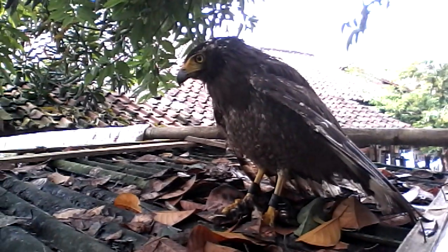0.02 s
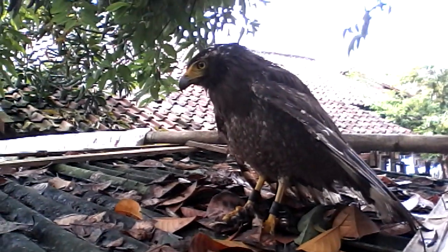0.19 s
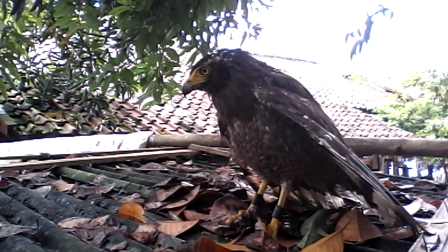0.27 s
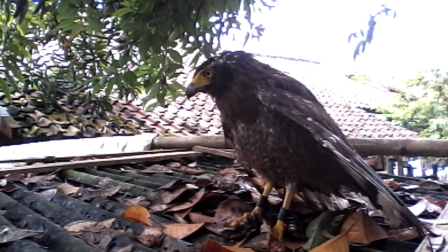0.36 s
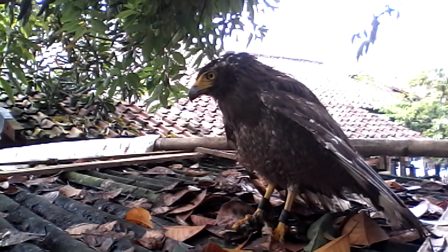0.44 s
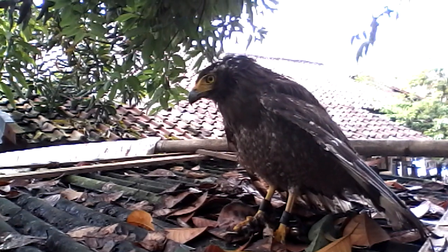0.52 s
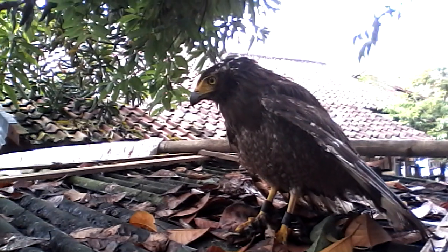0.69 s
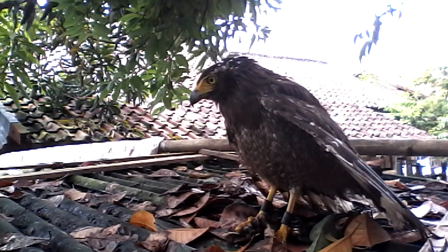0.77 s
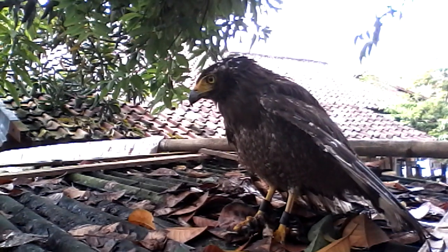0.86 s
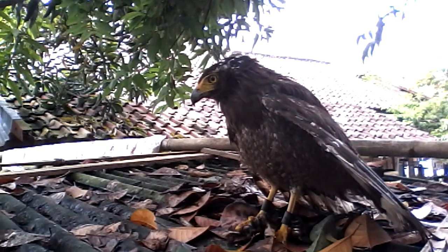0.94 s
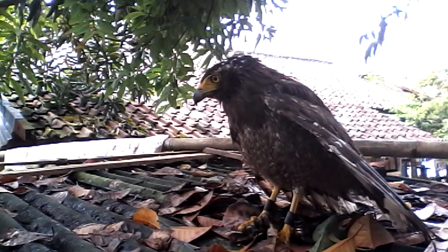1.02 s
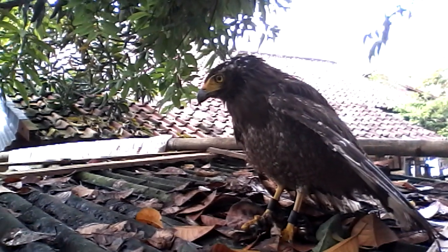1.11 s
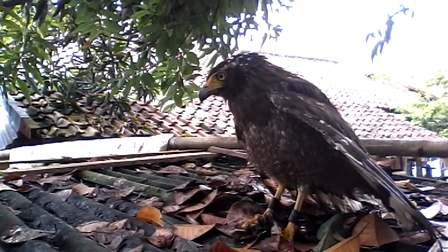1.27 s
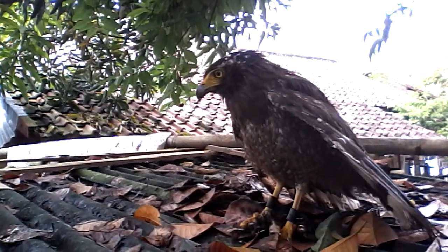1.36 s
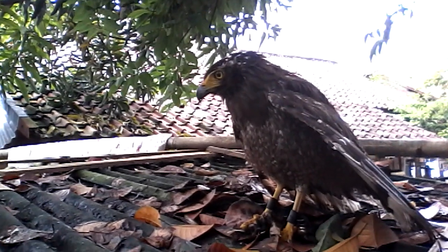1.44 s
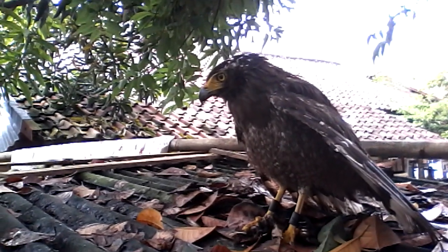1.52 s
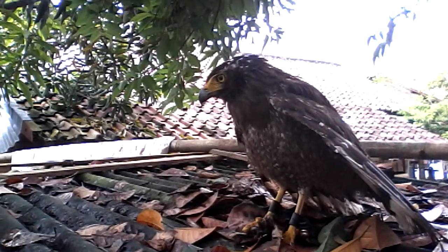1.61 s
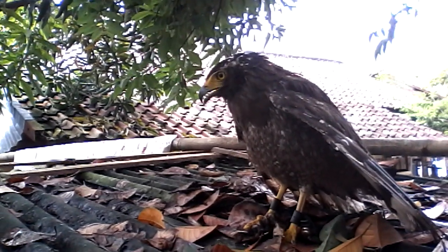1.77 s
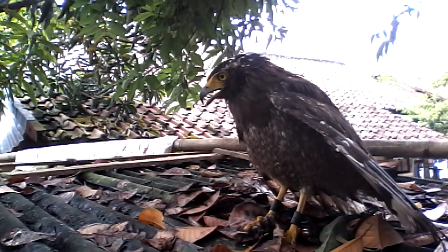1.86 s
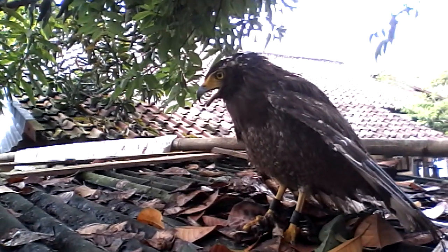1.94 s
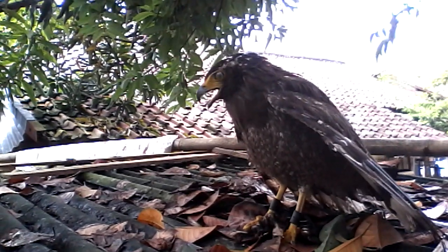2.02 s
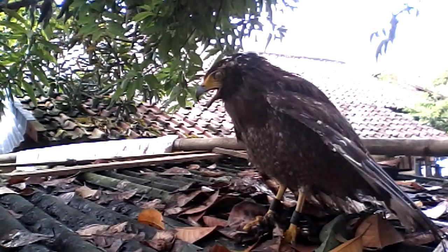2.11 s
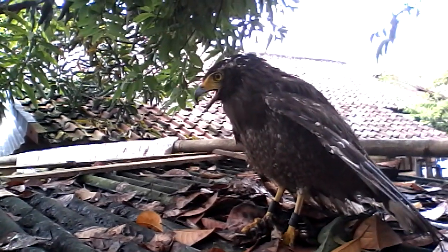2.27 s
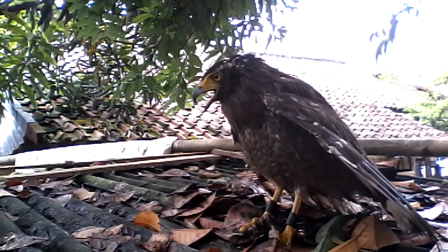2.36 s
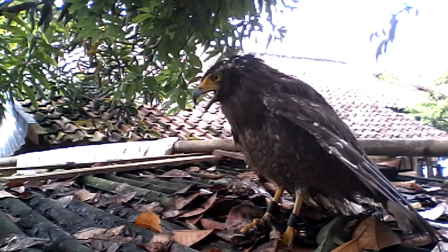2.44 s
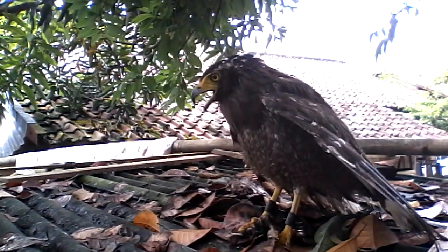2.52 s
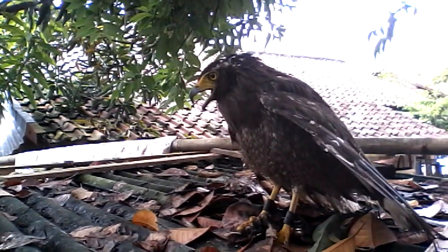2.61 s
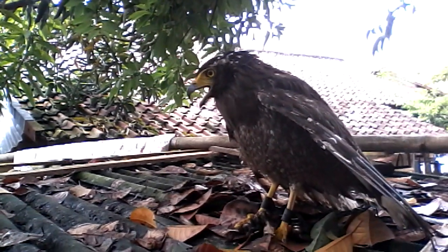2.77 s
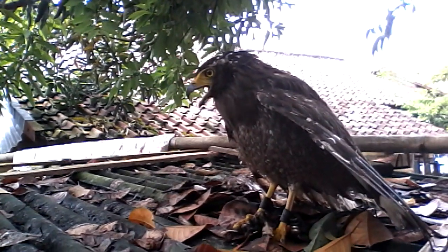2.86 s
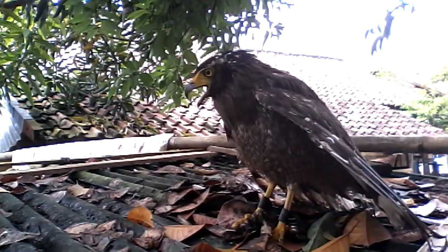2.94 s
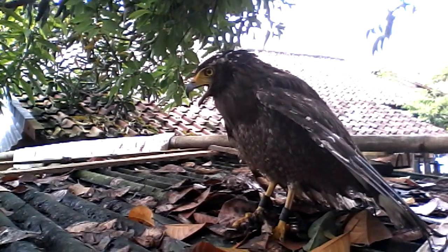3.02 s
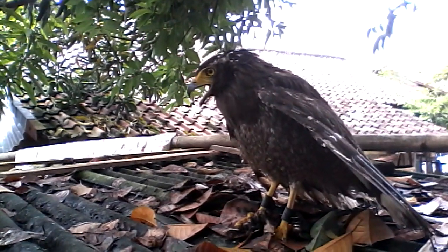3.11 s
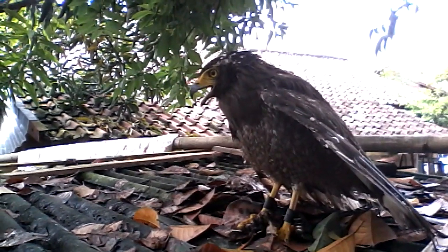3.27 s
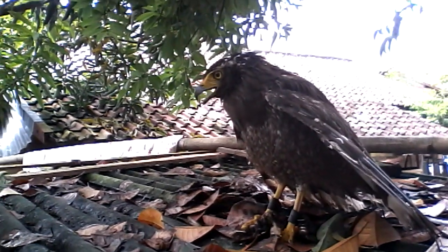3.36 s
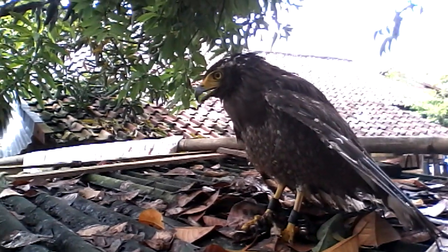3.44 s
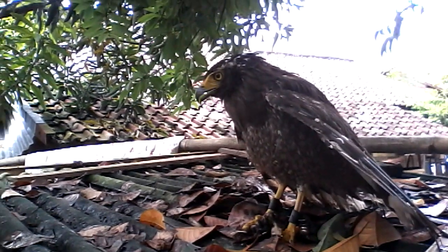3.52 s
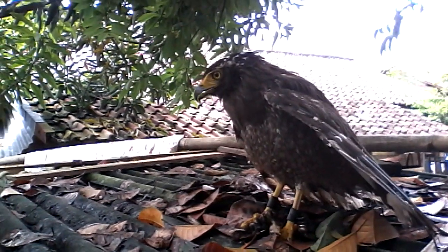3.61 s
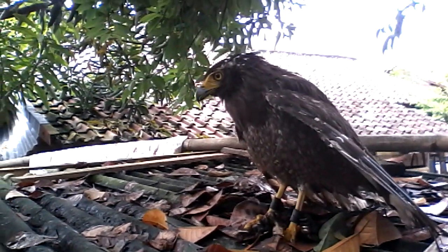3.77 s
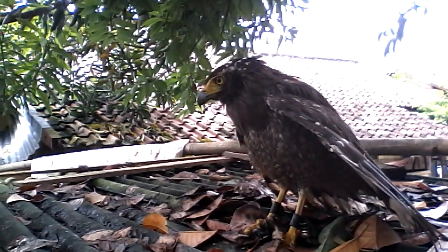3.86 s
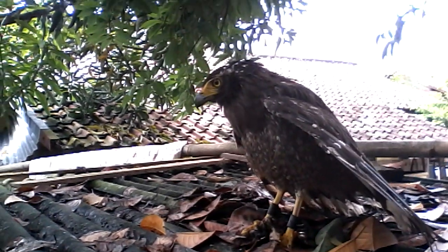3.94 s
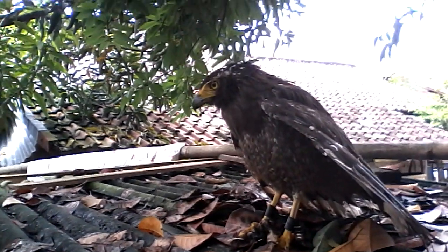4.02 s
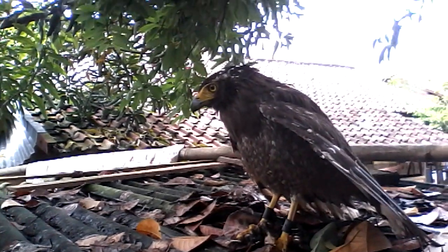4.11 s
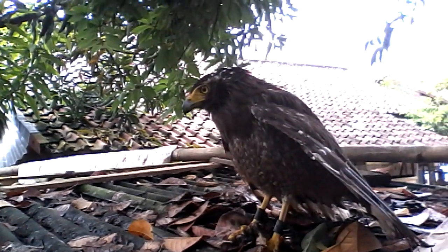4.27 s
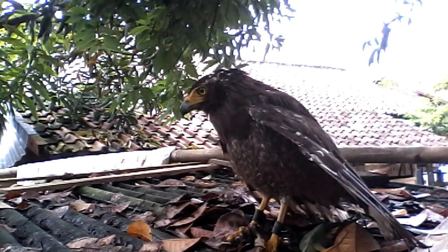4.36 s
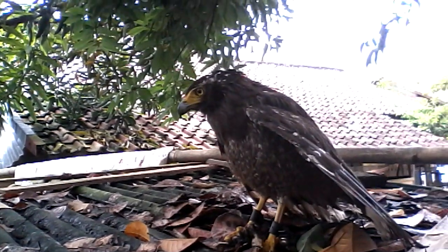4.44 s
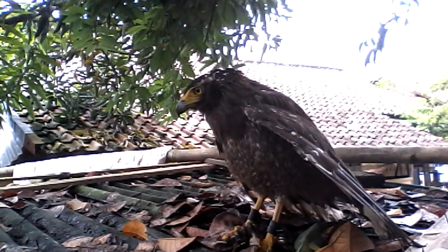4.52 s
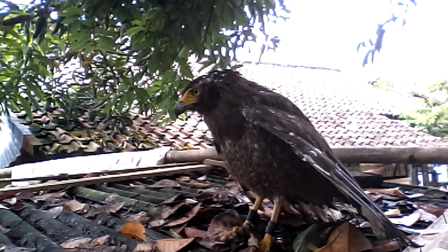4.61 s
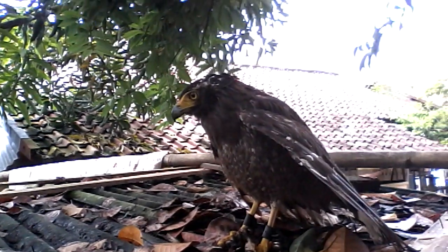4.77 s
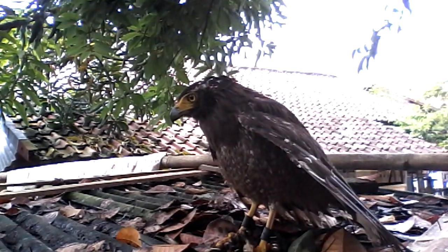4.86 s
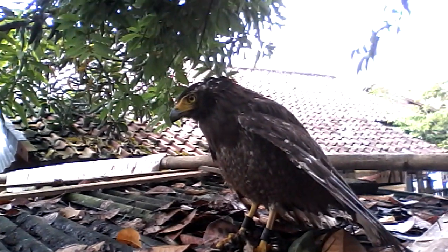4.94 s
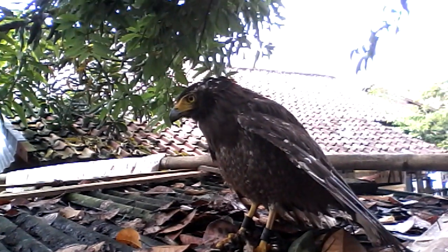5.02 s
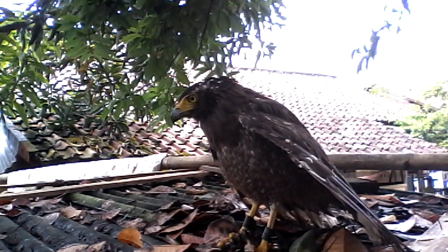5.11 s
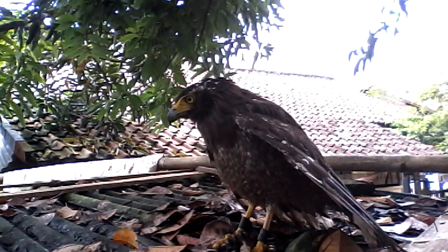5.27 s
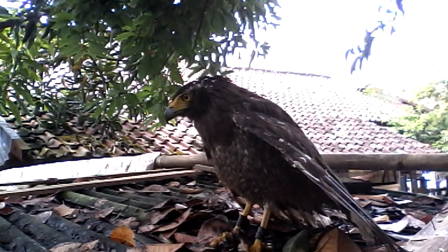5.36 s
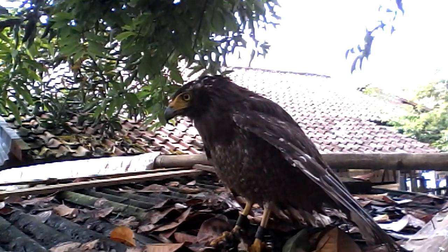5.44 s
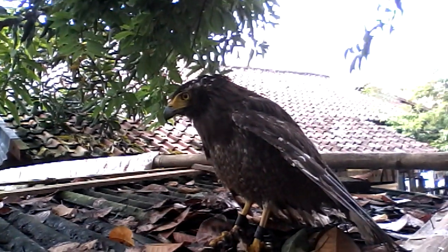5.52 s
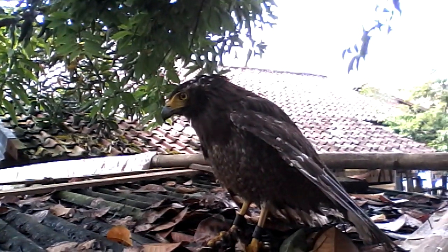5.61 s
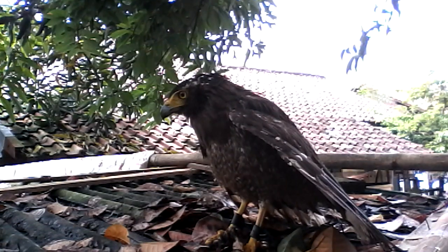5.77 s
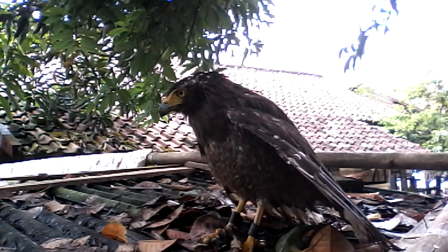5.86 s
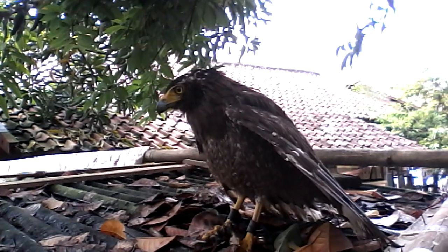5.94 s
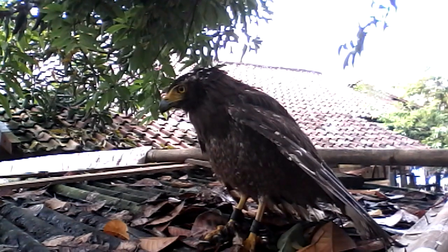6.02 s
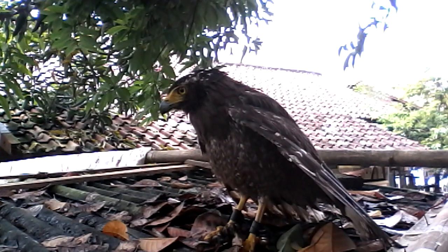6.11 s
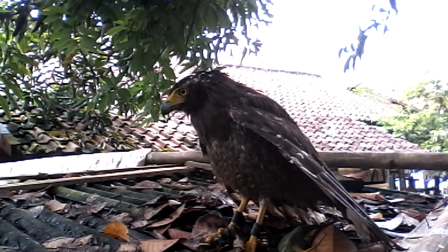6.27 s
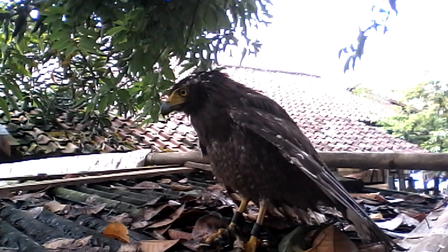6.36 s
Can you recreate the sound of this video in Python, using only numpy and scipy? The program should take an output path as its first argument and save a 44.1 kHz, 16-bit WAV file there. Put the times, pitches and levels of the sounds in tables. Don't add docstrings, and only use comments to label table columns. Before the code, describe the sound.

Quiet yard hiss, then a single loud high rasping whistle from a bird of prey close by, followed by far hens clucking and cackling.

```python
import sys
import numpy as np
from scipy import signal
from scipy.fft import rfft, irfft
from scipy.io import wavfile

SR = 44100
rng = np.random.default_rng(int(sys.argv[2]) if len(sys.argv) > 2 else 0)


def boost_factor(decibels):
    exponent = np.asarray(decibels, float) / 20
    return 10 ** exponent


def file_out(sig):
    cols = np.atleast_2d(sig).T
    lim = np.clip(cols, -1, 1)
    pcm = np.round(lim * 32767).astype(np.int16)
    wavfile.write(sys.argv[1], SR, pcm)


N = 281799

# frequency_hz, density_db (per Hz)
FLOOR_SPECTRUM = [(12, -44), (20, -6), (133, 0.5), (214, -4), (274, -2.5), (334, -4.5), (394, -2.5),
                  (521, -6), (616, -5), (770, -7), (1310, -9.5), (7350, -16), (15600, -15)]
# frequency_hz, level_db
CAMERA_WHINES = [(2024, -87.5), (6448, -81.5), (11698, -86)]

# start_s, length_s, pitch_hz, level_db
FLOCK_CLUCKS = [(0, 0.14, 468, -66.5), (.021, 0.084, 552, -70.5), (.089, 0.14, 460, -74.5),
                (4.041, 0.1, 406.5, -68), (4.102, 0.12, 475, -69.5), (4.168, .09, 394, -68),
                (4.2, 0.15, 464, -70), (4.377, 0.18, 605, -65), (4.4, 0.11, 448.5, -66),
                (4.401, 0.22, 410, -68.5), (4.478, 0.11, 523, -65.5), (4.491, .12, 410, -64),
                (4.497, 0.12, 465, -65), (4.736, 0.046, 371, -66.5), (4.812, 0.14, 400, -65),
                (4.843, 0.042, 515, -60.5), (4.851, 0.025, 590, -62), (5.004, 0.063, 440, -63),
                (5.005, 0.067, 351, -64), (5.091, 0.094, 393, -63), (5.725, .051, 355, -66),
                (5.732, 0.049, 440, -63.5), (5.973, 0.075, 516, -66.5), (6.135, 0.031, 460, -65),
                (6.181, 0.079, 467, -67)]
# start_s, length_s, pitch_hz, level_db
PULLET_CLUCKS = [
    (4.346, 0.057, 541, -62),
    (4.813, 0.051, 574, -61.5),
    (5.113, .06, 555, -63),
]
# start_s, pitch_hz, level_db
LEAD_CACKLE = [
    (5.347, 425.6, -60.5),
    (5.547, 434, -64.5),
    (5.755, 404.7, -60.5),
    (5.944, 408, -62.5),
    (6.139, 414.5, -60),
]
# start_s, length_s, pitch_hz, level_db
FAR_PEEPS = [
    (0.438, 0.053, 2055, -68),
    (0.456, 0.04, 2306, -67),
    (.925, 0.066, 519, -67),
    (4.635, 0.031, 361, -66.5),
    (4.636, 0.039, 627, -68.5),
    (4.685, 0.019, 2190, -65),
    (4.922, 0.039, 113, -63),
]

# time_s, level_db
WHISTLE_EFFORT = [
    (2.113, -39),
    (2.121, -38),
    (2.309, -28.5),
    (2.397, -21.5),
    (2.643, -20.5),
    (3.127, -25),
    (3.369, -20),
    (3.541, -35.5),
    (3.56, -60),
]
# middle_s, half_length_s, change_db
BREATH_PUSHES = [
    (2.152, 0.014, 3),
    (2.216, 0.066, -5.5),
    (2.7, .03, 2),
    (2.78, 0.024, 3),
    (3.355, .04, 3),
]
# middle_s, depth (0-1), half_length_s
AIR_CATCHES = [
    (2.171, .25, .004),
    (2.322, .3, .008),
    (2.362, .35, .01),
    (2.376, .6, .004),
    (2.432, .75, .004),
    (2.455, .4, .008),
    (2.735, .45, .015),
    (3.395, .4, .004),
    (3.461, .7, .004),
]
PHASE_SLIPS = [2.758, 2.93, 3.02, 3.052, 3.17, 3.23, 3.263, 3.302, 3.322, 3.42]
# multiple, line_db,
# lower_flutter_db, upper_flutter_db, rasp_skirt_db, skirt_reach_hz (below the line)
WHISTLE_LINE = [(1, 1, -61, -17, -10.5, 180)]
OVERTONE_LINES = [(2, -2.5, -3.5, -24, -1, 780), (3, -18.5, -24, -28, -12, 330),
                  (4, -35, -22, -46, -18, 700), (5, -52, -40, -51, -21, 780)]
HALF_PITCH_LINE = [(.5, 3, -12, -20, -12, 480)]
RASP_LINES = [(1.5, -9.5, -1.5, -9, 1.5, 470), (2.5, -6, -2, -12, -7, 610), (3.5, -29, -35, -17, -18, 1100),
              (4.5, -21, -14, -25.5, -8, 490)]
# frequency_hz, density_db
BREATH_SPECTRUM = [(300, -59), (600, -20.5), (1300, -7), (1800, -18), (2400, 0.5), (3300, -8.5),
                   (3800, -3.5), (4330, -37), (5000, -6.5), (6200, -12), (7600, -16.5), (9200, -16.5),
                   (11500, -18), (13200, -19.5), (14200, -28), (15700, -27.5)]
# frequency_hz, width_hz, level_db
THROAT_RINGS = [(3420, 78, -15.5), (3833, 80, -0.5), (4804, 110, 6.5), (6350, 280, -6.5), (8610, 250, -6.5),
                (10400, 400, -10), (11980, 400, -10), (13300, 500, -12)]
# time_s, pitch_hz, level_db
SECOND_SIDE = [
    (2.13, 3340, -72),
    (2.18, 3423, -57),
    (2.222, 3397, -48),
    (2.3, 3450, -51),
    (2.38, 3480, -49),
    (2.47, 3470, -47),
]
# whistle_count, second_voice_count, level_db
MIXED_TONES = [(0, 1, 0), (-1, 1, -26), (2, -1, -18), (1, 1, -10), (3, -1, -14)]
# time_s, pitch_hz, level_db
CROAK_FALL = [
    (3.555, 980, -60),
    (3.563, 890, -50),
    (3.572, 790, -46),
    (3.585, 720, -50),
    (3.6, 612, -58),
    (3.614, 560, -70),
]

START_S, END_S = 2.113, 3.562
# middle_s, half_length_s
OPENS, BREAKS, SETTLES, FILLS = (2.125, 0.009), (2.27, 0.038), (2.42, 0.14), (2.435, 0.06)
LOCKS, LOOSENS, RELOCKS, CLOSES = (2.768, 0.006), (3.34, 0.033), (3.475, 0.018), (3.532, .008)
CATCH_SHARE = .4


def evened(x):
    return x / np.sqrt(np.mean(abs(x) ** 2) + 1e-20)


def read(points, hz):
    f, value = np.transpose(points)
    return np.interp(np.log(hz + 1), np.log(f + 1), value)


def curves(rows, t):
    s, *columns = np.transpose(rows)
    return [np.interp(t, s, c) for c in columns]


def add(mix, s, sound):
    part = mix[round(s * SR):][:len(sound)]
    part += sound[:len(part)]


def band(size, below_hz, above_hz):
    hz = np.fft.fftfreq(size, 1 / SR)
    shape = np.exp(-np.where(hz < 0, -hz / below_hz, hz / above_hz) ** 1.5)
    noise = rng.standard_normal(size) + 1j * rng.standard_normal(size)
    return evened(np.fft.ifft(shape * np.fft.fft(noise)))


def coloured(points, size):
    gain = boost_factor(read(points, np.fft.rfftfreq(size, 1 / SR)))
    return evened(irfft(rfft(rng.standard_normal(size)) * gain, size))


def resonate(x, hz, width_hz):
    return signal.lfilter(*signal.iirpeak(hz, hz / width_hz, SR), x)


def background():
    t = np.arange(N) / SR
    hiss = boost_factor(-57.5) * coloured(FLOOR_SPECTRUM, N)
    swell = boost_factor(0.5 * evened(band(N, 1.4, 0.73).real))
    insects_hz, width_hz = 7300, 400
    insects = band(N, width_hz, width_hz) * np.exp(2j * np.pi * insects_hz * t)
    chorus = boost_factor(-74.5) * evened(insects.real)
    whines = sum(boost_factor(db + 3.5) * np.sin(2 * np.pi * hz * t) for hz, db in CAMERA_WHINES)
    return hiss * swell + chorus + whines


def cluck(s, length, first_hz, last_hz, db, throat_hz):
    u = np.arange(0, length, 1 / SR) / length
    hz = last_hz + (first_hz - last_hz) * np.exp(-(u / 0.25) ** 2)
    turn = 2 * np.pi * np.cumsum(hz * (1 + .01 * band(len(u), 90, 90).real)) / SR
    pulses = sum(np.cos(k * turn) for k in range(1, 6))
    hoarse = 1.55 * boost_factor(-1.2 * (db + 58))
    pulses = pulses + hoarse * rng.standard_normal(len(u))
    chest = boost_factor(-9) * resonate(resonate(pulses, 594, 400), 594, 400)
    mouth = boost_factor(-15) * resonate(resonate(pulses, 2100, 700), 2100, 700)
    throat = resonate(resonate(pulses, throat_hz, 330), throat_hz, 330)
    envelope = np.tanh(u / 0.14) * np.exp(-u / 0.89) * np.sqrt(1 - u)
    return s, boost_factor(db + 11.0) * evened(throat - chest - mouth) * envelope


def peep(s, length, hz, db):
    u = np.arange(0, length, 1 / SR) / length
    wobble = 1 + 0.041 * band(len(u), 44, 40).real
    return s, boost_factor(db + 9) * np.sin(2 * np.pi * np.cumsum(hz * wobble) / SR) * np.sin(np.pi * u)


def hen_yard():
    hens = np.zeros(N)
    flock_tuning, pullet_tuning = 3.07, 2.35
    cackle_scoop, flock_scoop = 0.073, 0.02
    for rows, tuning in ((FLOCK_CLUCKS, flock_tuning), (PULLET_CLUCKS, pullet_tuning)):
        for s, length, hz, db in rows:
            add(hens, *cluck(s, length, hz * (1 - flock_scoop), hz, db, hz * tuning))
    for row in FAR_PEEPS:
        add(hens, *peep(*row))
    for s, hz, db in LEAD_CACKLE:
        add(hens, *cluck(s, 0.0975, hz * (1 - cackle_scoop), hz, db, hz * flock_tuning))
    return hens


def yard(x, t60, start_s):
    t = np.arange(0, .6, 1 / SR)
    struck = rng.random(len(t)) < .2
    taps = rng.standard_normal(len(t)) * struck * boost_factor(-60 * t / t60) * (t > start_s)
    taps = signal.lfilter([1], [1, -.25], taps)
    return signal.fftconvolve(x, taps / np.linalg.norm(taps))[:N]


def beak():
    t = np.arange(0, .02, 1 / SR)
    return 2.092, boost_factor(-45) * resonate(rng.standard_normal(len(t)), 800, 1400) * np.sin(np.pi * t / t[-1])


def past(t, stage):
    return .5 + .5 * np.tanh((t - stage[0]) / stage[1])


def locking(t):
    return past(t, LOCKS) - past(t, LOOSENS) + past(t, RELOCKS)


def whistle_pitch(t):
    u = t - START_S
    rise = 400 * np.exp(-u / .03) + 190.5 * np.exp(-u / .3)
    return 2791 - rise - 700 * np.exp((t - END_S) / .052)


def layer_levels(t):
    thin, late, closed = 1 - past(t, FILLS), past(t, LOOSENS), past(t, CLOSES)
    pushes = sum(db * np.exp(-((t - s) / half_s) ** 2) for s, half_s, db in BREATH_PUSHES)
    whistle_db = curves(WHISTLE_EFFORT, t)[0] + pushes
    octave_db = -30 - 20 * (1 - past(t, OPENS)) - 6 * thin
    octave_db = octave_db - 22 * past(t - .008, CLOSES)
    unbroken = 1 - past(t + 0.037, BREAKS)
    half_db = -47 - 21.5 * unbroken + 2.5 * locking(t) - 6 * past(t, RELOCKS) - 30 * closed
    rasp_db = -36.5 - 11 * np.clip(1 - (t - START_S) / 0.19, 0, 1) - 15.5 * thin - 5 * late - 16 * closed
    return whistle_db, octave_db, half_db, rasp_db


def membrane_state(t):
    pure, relocked = 1 - past(t, BREAKS), past(t, RELOCKS)
    clean_broken, clean_settled, lock_loose = 0.17, 0.64, .05
    broken = clean_broken + (clean_settled - clean_broken) * past(t, SETTLES)
    clean = pure + (1 - pure) * broken + 0.23 * relocked
    lock = lock_loose + (1 - lock_loose) * locking(t)
    flutter_hz = 188.4 + 73 * np.clip((t - START_S) / .62, 0, 1) ** 2
    flutter_db = -2.5 - 20 * (pure + past(t, CLOSES))
    bright_db = -1 + 4.5 * pure - 11 * relocked
    return np.clip(clean, 0, 1), np.clip(lock, 0, 1), flutter_hz, flutter_db, bright_db


def breath(size):
    air = coloured(BREATH_SPECTRUM, size)
    rings = sum(boost_factor(db) * evened(resonate(air, hz, width_hz)) for hz, width_hz, db in THROAT_RINGS)
    return air + rings * boost_factor(-9.0)


def voice_line(row, carrier, hz, turn, flutter, clean, lock, bright_db):
    multiple, line_db, lower_db, upper_db, skirt_db, reach_hz = row
    sides = boost_factor(lower_db) * flutter.conj() + boost_factor(upper_db) * flutter
    lines = np.sqrt(clean / 0.8) * boost_factor(line_db) + sides
    dull = boost_factor(bright_db * max(multiple - 2, 0))
    null_hz, half_hz, depth = 7350, 450, .8
    lines = lines * dull * (1 - depth * np.exp(-((multiple * hz - null_hz) / half_hz) ** 2))
    skirt = np.sqrt((1 - clean) / 0.55) * boost_factor(skirt_db) * band(len(hz), reach_hz, 64)
    skirt = skirt * (1 + 0.07 * flutter.real)
    skirt = skirt * (1 - lock * (.75 * (multiple in (.5, 1.5)) + .25 * (multiple == 1)))
    spin = np.exp(1j * (multiple * turn + .7 * multiple ** 2))
    return np.sqrt(2) * ((carrier * lines + skirt * np.sqrt(dull)) * spin).real


def second_voice(t, turn):
    hz, db = curves(SECOND_SIDE, t)
    own = 2 * np.pi * np.cumsum(hz + 50 * evened(band(len(t), 120, 120).real)) / SR
    fade = np.interp(t, [2.12, 2.14, 2.42, 2.48], [0, 1, 1, 0])
    tones = sum(boost_factor(d) * np.cos(a * turn + b * own) for a, b, d in MIXED_TONES)
    return fade * boost_factor(db + 10.0) * tones


def scream():
    t = np.arange(START_S, END_S, 1 / SR)
    size = len(t)
    hz = whistle_pitch(t)
    whistle_db, octave_db, half_db, rasp_db = layer_levels(t)
    clean, lock, flutter_hz, flutter_db, bright_db = membrane_state(t)
    jitter_hz = 16 * evened(band(size, 70.6, 67).real) * (1.2 - clean)
    turn = 2 * np.pi * np.cumsum(hz + jitter_hz) / SR
    uneven = 1 + 0.11 * (1.4 - lock) * evened(band(size, 38, 32.6).real)
    flutter = np.exp(2j * np.pi * np.cumsum(flutter_hz * uneven) / SR)
    flutter = flutter * boost_factor(flutter_db + 1.06 * evened(band(size, 23.5, 25).real))
    sign = np.prod([np.tanh((t - s) / 0.0011) for s in PHASE_SLIPS], axis=0)
    skip = np.sqrt(lock) * sign + np.sqrt(1 - lock) * band(size, 310, 105)
    catches = [1 - np.clip(depth, 0, 1) * np.exp(-((t - s) / half_s) ** 2) for s, depth, half_s in AIR_CATCHES]
    caught = np.prod(catches, axis=0)
    air_level = boost_factor(octave_db - 4.5) * (1 - .7 * past(t, CLOSES)) * np.sqrt(1.05 - clean)
    out = air_level * breath(size) * (1 + 0.298 * flutter.real)
    layers = ((WHISTLE_LINE, whistle_db, 1), (OVERTONE_LINES, octave_db, 1),
              (HALF_PITCH_LINE, half_db, skip), (RASP_LINES, rasp_db, skip))
    for rows, db, carrier in layers:
        for row in rows:
            line = voice_line(row, carrier, hz, turn, flutter, clean, lock, bright_db)
            extra_catch = caught ** ((row[0] == 1) * (1 - CATCH_SHARE))
            out = out + boost_factor(db) * extra_catch * line
    out = out + second_voice(t, turn)
    flow = boost_factor(0.27 * evened(band(size, 32.0, 40).real))
    return t[0], out * flow * caught ** CATCH_SHARE * signal.windows.tukey(size, .004)


def croak():
    t = np.arange(CROAK_FALL[0][0], CROAK_FALL[-1][0], 1 / SR)
    hz, db = curves(CROAK_FALL, t)
    turn = 2 * np.pi * np.cumsum(hz) / SR
    return t[0], boost_factor(db + 1) * (np.sin(turn) + boost_factor(-8) * np.sin(2 * turn) + boost_factor(-20) * np.sin(3 * turn))


def scene():
    hens, eagle = hen_yard(), np.zeros(N)
    for sound in (beak, scream, croak):
        add(eagle, *sound())
    near = eagle + boost_factor(-14.5) * yard(eagle, 0.17, .002) + boost_factor(-21.5) * yard(eagle, 0.38, 0.0201)
    far = hens + boost_factor(-8) * yard(hens, .3, .012)
    return (near + far + background())[None]


def band_limit(x):
    return signal.sosfilt(signal.butter(12, 15750, fs=SR, output="sos"), x)


def record(dry):
    notch_hz, width_hz, depth = 11580, 260, .55
    x = dry - depth * resonate(dry, notch_hz, width_hz)
    x = signal.lfilter(*signal.butter(2, 50, "high", fs=SR), x)
    treble_limit = signal.firwin(801, 15740, window=("kaiser", 9), fs=SR)
    x = signal.oaconvolve(x, treble_limit[None], "same")
    return band_limit(x)


dry = scene()
out = record(dry)
file_out(out)
```